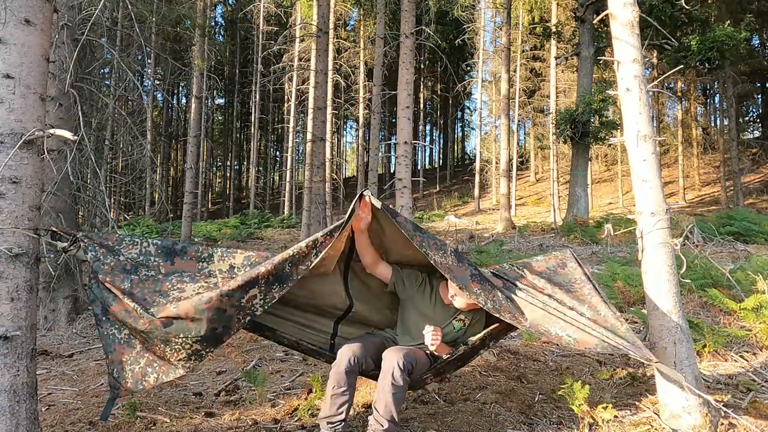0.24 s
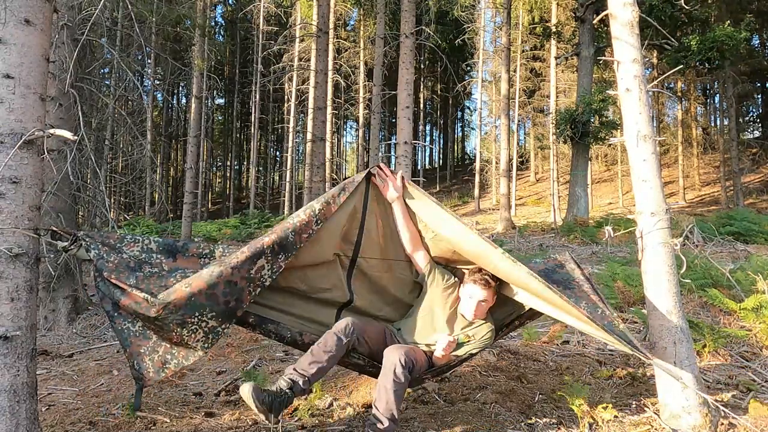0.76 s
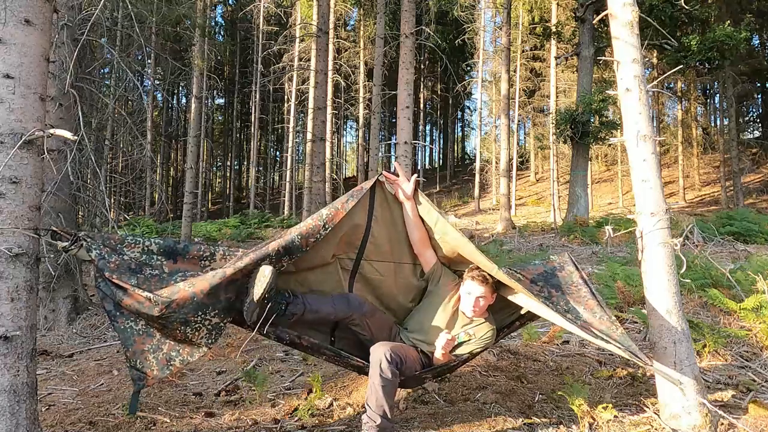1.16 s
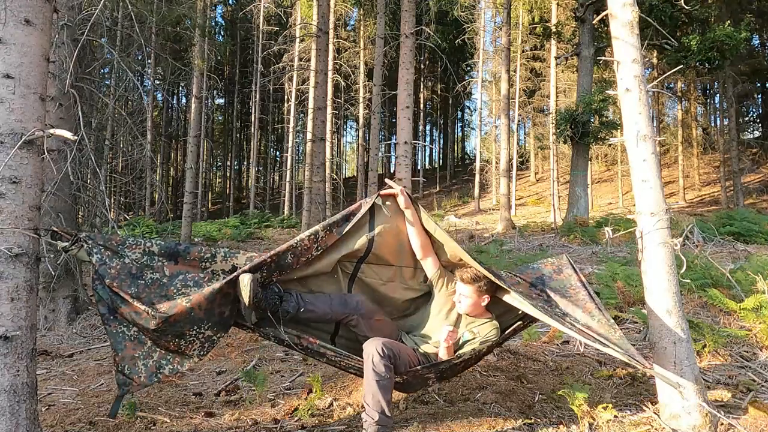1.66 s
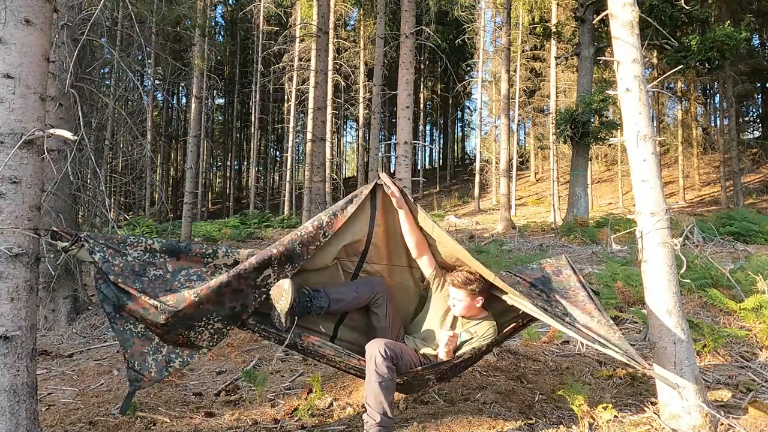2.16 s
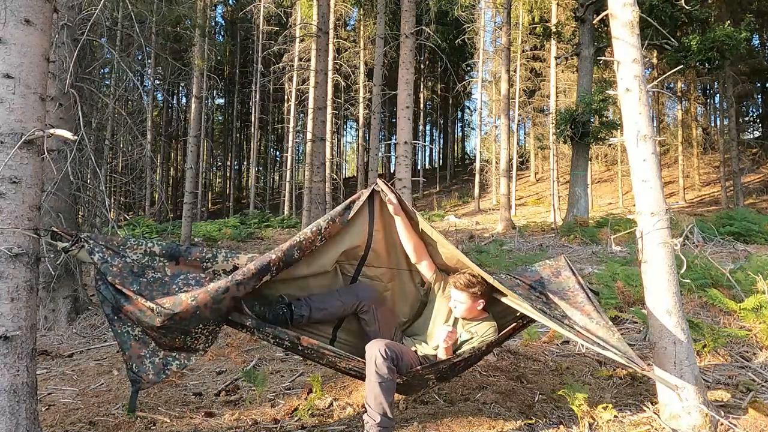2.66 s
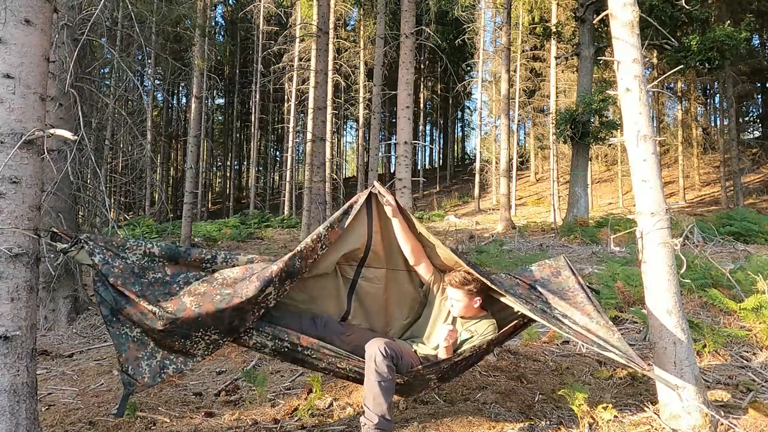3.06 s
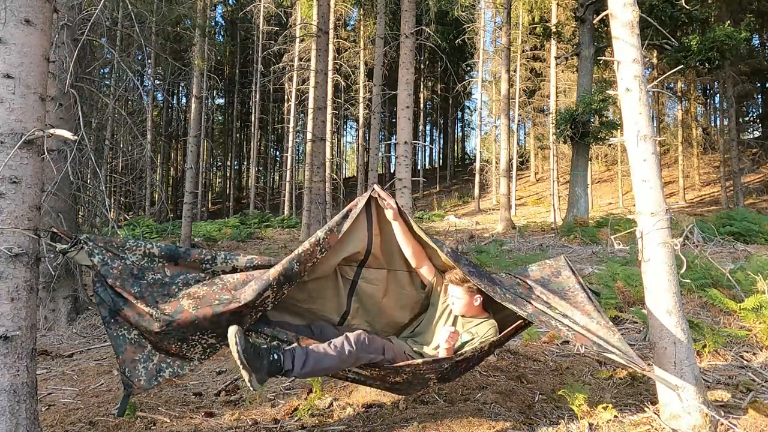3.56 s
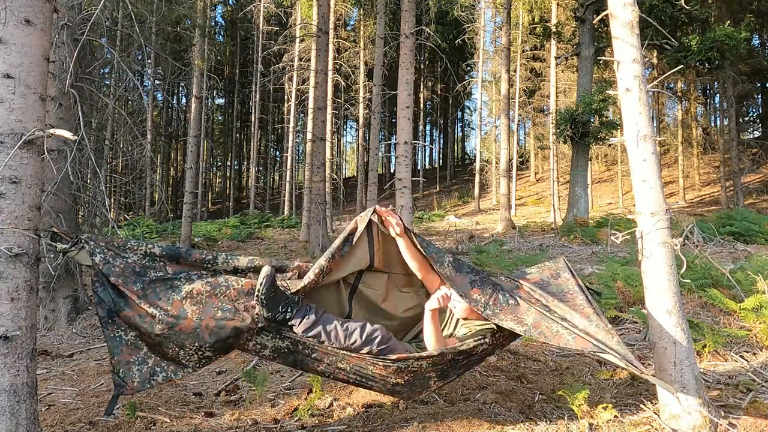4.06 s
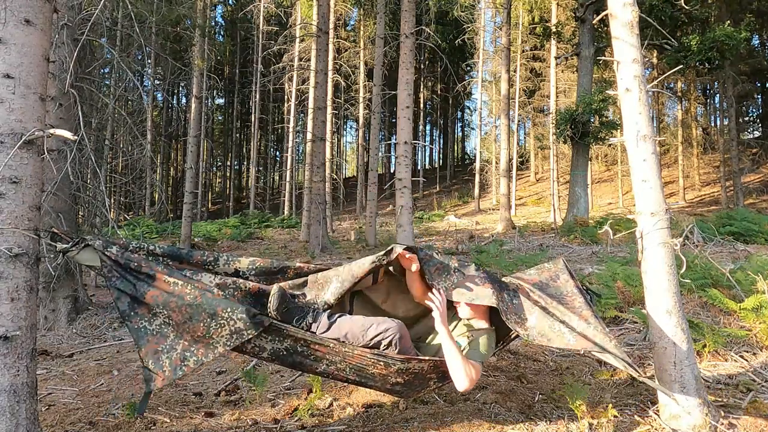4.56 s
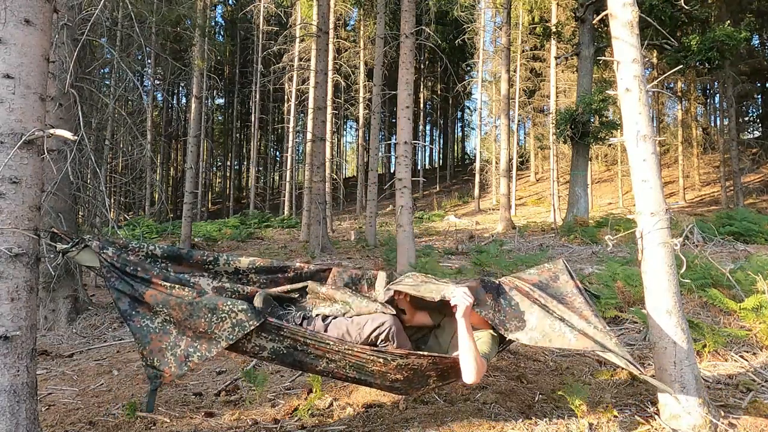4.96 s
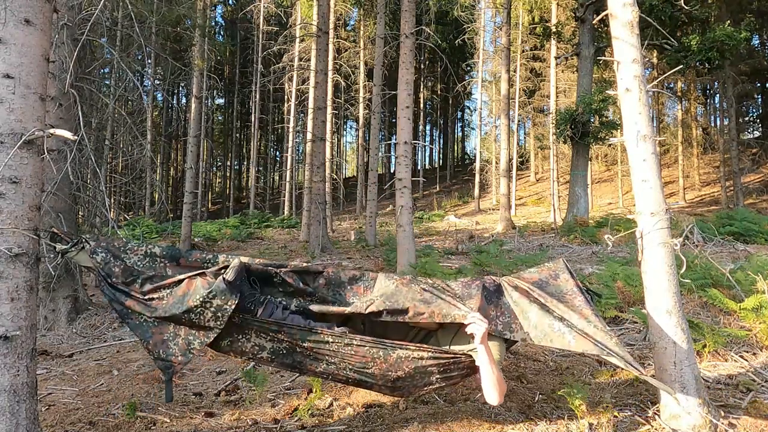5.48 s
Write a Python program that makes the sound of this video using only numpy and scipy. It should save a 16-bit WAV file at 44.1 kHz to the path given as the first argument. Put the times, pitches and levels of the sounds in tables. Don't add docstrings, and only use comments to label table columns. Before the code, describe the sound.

Close, nearly mono capture of a person getting into a coated-fabric hammock in a still conifer wood. Uneven rubbing strokes hiss and crinkle, creases snap, a quick zip-like squeak comes early on, longer whistling swipes follow, then the flap is pulled over with heavier rustling and a sharp pop. Slow low-frequency air puffs press on the microphone over a faint forest hush.

```python
import sys
import numpy as np
from scipy import signal
from scipy.fft import rfft, irfft
from scipy.io import wavfile

SR = 44100
rng = np.random.default_rng(int(sys.argv[2]) if len(sys.argv) > 2 else 0)


def bounce(signal):
    frames = np.transpose(np.atleast_2d(signal))
    limited = np.clip(frames, -1, 1)
    pcm = np.round(limited * 32767).astype(np.int16)
    wavfile.write(sys.argv[1], SR, pcm)


def volts_from_decibels(level):
    exponent = np.asarray(level, float) / 20
    return 10 ** exponent


N = 252252


def rms_one(x):
    return x / np.sqrt(np.mean(x ** 2) + 1e-20)


def in_time(rows):
    seconds, *columns = np.transpose(rows)
    return [np.interp(np.arange(N) / SR, seconds, column) for column in columns]


def coloured(x, points):
    hz = np.maximum(np.arange(N // 2 + 1) * SR / N, .1)
    at, db = np.transpose(points)
    return rfft(x) * volts_from_decibels(np.interp(np.log(hz), np.log(at), db))


def steady_noise(points):
    return rms_one(irfft(coloured(rng.standard_normal(N), points), N))


def drift(rate):
    r = np.exp(-80 * np.pi * rate / SR)
    noise = rng.standard_normal(N // 40 + 2002)
    slow = signal.lfilter([1], [1, -2 * r, r * r], noise)[2000:]
    return np.interp(np.arange(N) / 40, np.arange(len(slow)), rms_one(slow))


def ring(x, hz, t60):
    r, w = volts_from_decibels(-60 / (t60 * SR)), 2 * np.pi * hz / SR
    return signal.lfilter([0, np.sin(w)], [1, -2 * r * np.cos(w), r * r], x)


# frequency in Hz, level in dB per Hz.
FOREST_COLOUR = [(15, -2), (30, -5.5), (60, -9.5), (110, -6.5), (170, -11.5), (400, -16), (1000, -14.5),
                 (3000, -17), (6500, -21), (8250, -15), (10600, -27), (12800, -20.5), (15700, -29)]


def forest_air():
    return volts_from_decibels(-65) * steady_noise(FOREST_COLOUR)


# time in seconds, level in dB.
PUMP_LEVEL = [
    (0, -54),
    (.7, -49),
    (1.45, -47),
    (1.95, -58),
    (2.3, -52),
    (3.2, -56),
    (4.0, -43),
    (4.75, -48),
    (5.3, -43),
    (5.72, -52),
]
# frequency in Hz, level in dB per Hz.
PUMP_COLOUR = [(.5, -26), (1.5, -1), (3, 3), (6, -6.5), (11, -16), (18, -19.5), (30, -30), (60, -37.5),
               (150, -63.5)]


def sheet_pump():
    return volts_from_decibels(in_time(PUMP_LEVEL)[0]) * steady_noise(PUMP_COLOUR)


def snap(noise, hz, t60, crack_db):
    t = np.arange(len(noise)) / SR
    t60 = np.clip(t60, .003, .04)
    burst = volts_from_decibels(-22) * noise * volts_from_decibels(-60 * t / (1.7 * t60))
    burst[40] -= 1
    body = ring(burst, hz, t60)
    body -= volts_from_decibels(-3) * ring(burst, 1.7 * hz, .45 * t60)
    body -= volts_from_decibels(-11) * ring(burst, .62 * hz, t60)
    bright = signal.butter(1, [2200, 7500], "band", fs=SR, output="sos")
    crack = signal.sosfilt(bright, burst)
    return body / abs(body).max() + volts_from_decibels(crack_db) * crack / abs(crack).max()


def snaps(rows, crack_db):
    length = 4000
    out = np.zeros(N + length)
    for s, db, hz, t60 in rows:
        start = round(s * SR) - 40
        out[start:start + length] += volts_from_decibels(db) * snap(rng.standard_normal(length), hz, t60, crack_db)
    direct = out[:N]
    echo_s, echo_db = .0036, -10
    return direct + volts_from_decibels(echo_db) * np.roll(direct, round(echo_s * SR))


# start in seconds, peak in dB, ring in Hz, t60 in seconds.
CRACKS = [(.0321, -37.5, 2500, .005), (.0333, -35.5, 860, 0.0065), (.0332, -36, 2420, .007),
          (.0368, -43.5, 1390, 0.015), (.1192, -42.5, 950, 0.017), (1.4218, -38.5, 1200, 0.023),
          (2.07, -50, 890, .012), (2.247, -47, 700, 0.011), (2.277, -50, 2220, .008),
          (2.32, -39, 1510, 0.014), (2.338, -39, 2570, .01), (2.3425, -36, 3100, 0.0071),
          (4.502, -68, 1900, 0.0016), (4.785, -40.5, 1360, .015), (4.79, -40.5, 4270, 0.016),
          (4.871, -38, 1380, 0.0063), (5.009, -41.5, 845, .0073)]


def crease_cracks():
    return snaps(CRACKS, crack_db=-2.5)


# start in seconds, peak in dB, ring in Hz, t60 in seconds.
POPS = [(.375, -50.5, 640, 0.027), (1.271, -40, 1110, .011), (1.299, -40, 1560, 0.016),
        (1.519, -53, 480, 0.019), (1.61, -47, 980, 0.012), (1.791, -38.5, 2360, 0.0044),
        (2.005, -46, 630, 0.037), (2.447, -45.5, 1310, 0.0075), (2.67, -40, 1490, 0.013),
        (2.789, -46, 514, 0.01), (2.97, -37.5, 1534, 0.0065), (3.202, -55, 296.2, .025),
        (3.203, -49, 655, 0.018), (3.345, -64, 900, 0.011), (3.718, -42.5, 704, 0.019),
        (3.982, -44, 750, 0.0063), (4.012, -41, 2520, 0.012), (4.245, -36, 4500, .008),
        (4.76, -42, 3300, 0.021), (4.826, -43, 496, 0.0092), (4.838, -46, 650, 0.011),
        (4.848, -42, 610, 0.011), (5.012, -43, 1470, 0.017), (5.025, -46, 3280, 0.022),
        (5.037, -46, 600, 0.01), (5.21, -45, 1520, 0.01), (5.327, -29.5, 1950, 0.0028),
        (5.53, -38, 1450, .012), (5.699, -41, 1010, 0.025)]


def fold_pops():
    return snaps(POPS, crack_db=-3)


def whistle(rows, blur, steady):
    hz, *levels = in_time(rows)
    t = np.arange(N) / SR
    phase = 2 * np.pi * np.cumsum(hz * (1 + 0.01215 * drift(39.9))) / SR
    out = 0
    for k, db in enumerate(levels, 1):
        r = np.exp(-2 * np.pi * blur * k / SR)
        wobble = rms_one(signal.lfilter([1], [1, -2 * r, r ** 2], rng.standard_normal((2, N))))
        tone = (steady + wobble[0]) * np.cos(k * phase) + wobble[1] * np.sin(k * phase)
        flutter_db = 1.0 * drift(39)
        out = out + volts_from_decibels(db + flutter_db) * rms_one(tone)
    return out * (t > rows[0][0]) * (t < rows[-1][0])


# time in seconds, thread rate in Hz, fundamental in dB, octave in dB.
SAG = [
    (.78, 326, -73, -86),
    (.83, 362.6, -66, -101),
    (.93, 398, -68.5, -84),
    (1.02, 377, -64.5, -85),
    (1.08, 355, -86, -85),
]
TUG = [
    (2.23, 910, -77, -82),
    (2.245, 959, -67, -57),
    (2.265, 1044, -58, -52),
    (2.28, 1160, -63, -62),
    (2.29, 1200, -85, -80),
]
ZIP = [
    (2.295, 950, -78.5, -85),
    (2.31, 1031, -52, -70),
    (2.319, 1090, -48, -66),
    (2.322, 1454, -54, -57),
    (2.335, 1505, -43, -55),
    (2.339, 1310, -46, -47),
    (2.343, 1620, -54, -37.5),
    (2.349, 1590, -68, -64),
    (2.36, 1600, -90, -90),
]
LEAD_IN = [
    (2.5, 420, -90, -84),
    (2.54, 530, -80, -64),
    (2.57, 720, -82, -70),
    (2.605, 1010, -82, -66),
    (2.63, 1100, -90, -88),
]
SWIPE = [
    (2.68, 480, -88, -72),
    (2.70, 530, -80, -60),
    (2.76, 970, -68, -58),
    (2.82, 925, -64, -54),
    (2.865, 865, -66, -54.5),
    (2.945, 885, -68, -54.5),
    (3.02, 740, -68, -56),
    (3.06, 520, -68, -54),
    (3.11, 290, -78, -68),
]
SLACK = [
    (2.74, 943, -72, -90),
    (2.775, 1080, -55, -83),
    (2.82, 930, -65, -80),
    (2.9, 980, -58, -82),
    (2.97, 720, -60, -80),
    (3.03, 670, -57, -75),
    (3.1, 418, -65, -80),
    (3.14, 377, -77, -92),
]
SLIDE = [
    (3.96, 895, -71, -88),
    (4.04, 942, -55, -76),
    (4.11, 900, -70, -78),
    (4.185, 830, -58, -61),
    (4.3, 724, -64, -76),
    (4.4, 670, -88, -74),
]
FLAP = [
    (5.11, 1150, -78, -90),
    (5.14, 1076, -58, -80),
    (5.2, 1004, -63, -80),
    (5.25, 998, -59, -80),
    (5.3, 1160, -75, -90),
]


def weave_whistles():
    swipes = whistle(SWIPE, blur=30, steady=1.7) + whistle(LEAD_IN, blur=45, steady=.9)
    swipes += whistle(SLACK, blur=70, steady=.2)
    tugs = whistle(ZIP, blur=120, steady=.8) + whistle(TUG, blur=250, steady=.1)
    slow = whistle(SAG, blur=30, steady=.4) + whistle(SLIDE, blur=110, steady=.1)
    return swipes + tugs + slow + whistle(FLAP, blur=60, steady=.3)


def slips(per_s, spread_db, clump_db):
    sizes = volts_from_decibels(spread_db * np.minimum(rng.exponential(1, N), 3)) * rng.choice([-1, 1], N)
    born = rng.random(N) < per_s * volts_from_decibels(clump_db * drift(25)) / SR
    return rms_one(sizes * born)


def crinkles(body_db):
    pops = slips(per_s=160, spread_db=5.0, clump_db=3.5)
    pitches, dealt = np.geomspace(260, 4600, 14), rng.integers(0, 14, N)
    rings = 0
    for k, hz in enumerate(pitches):
        rings = rings + ring(pops * (dealt == k), hz, 5.9 / hz ** 0.92) * hz ** 0.57
    return volts_from_decibels(body_db - 11.5) * rms_one(rings)


# middle in seconds, half length in seconds, sheen in dB,
# heaviness in dB (how much more the low body sounds).
STROKES = [(0.112, 0.12, -77, 11), (0.415, 0.12, -57, -3), (0.715, 0.14, -61.5, 2),
           (0.973, 0.11, -56.5, -.5), (1.215, 0.061, -63, 3), (1.353, 0.056, -52.5, -2),
           (1.503, 0.059, -64, 1), (1.647, .05, -68, 4.5), (1.757, 0.051, -59.5, -1),
           (1.86, 0.032, -60, -0.5), (1.992, 0.068, -59.5, -2), (2.149, 0.08, -59.5, -3),
           (2.267, 0.024, -52.5, -3.5), (2.33, 0.019, -53.5, 4.5), (2.42, 0.056, -63, -4),
           (2.596, 0.03, -62.5, -21), (2.775, 0.066, -55.5, 3), (2.907, 0.093, -54, 2.5),
           (3.035, 0.035, -64, 12.5), (3.254, 0.073, -69, -7), (3.551, 0.075, -52, -4),
           (3.673, 0.12, -52, -3), (4.078, 0.1, -56, -2.6), (4.374, 0.19, -52.5, -1), (4.637, 0.11, -64, 6),
           (4.777, 0.034, -56.5, 2.5), (5.018, 0.065, -58, 1.5), (5.122, 0.045, -59, 1.5),
           (5.255, 0.1, -52, 2), (5.51, 0.14, -51.5, 0.4)]
# time in seconds, level in dB.
WEIGHT = [(0.0, -76.5), (1.24, -61), (1.91, -72), (2.02, -67), (2.1, -71.5), (2.28, -60), (2.9, -78),
          (3.09, -60.5), (3.39, -76.5), (3.78, -62.5), (3.9, -66.5), (4.01, -64), (4.72, -64),
          (4.86, -57.5), (4.92, -69.5), (5.51, -55), (5.58, -61), (5.72, -61)]
STROKE_DB = [-20.5, 0, -1.4, -1]
HEAVY_SHARE = [0.15, 1.03, 0.62, 0]
WEIGHT_DB = [7, 4.5, -6.5, -9.5]


def effort():
    t = np.arange(0, N + 64, 64) / SR
    s, half, db, heavy = np.transpose(STROKES)[:, :, None]
    rise_share, fall_share = 0.87, 0.92
    away = np.abs(t - s) / (np.maximum(half, .01) * np.where(t < s, rise_share, fall_share))
    stroke_db = db - 3.5 * np.minimum(away, 8) ** 2.46
    weight_db = np.interp(t, *np.transpose(WEIGHT))
    layers = []
    for layer_db, share, creep_db in zip(STROKE_DB, HEAVY_SHARE, WEIGHT_DB):
        strokes = np.sum(volts_from_decibels(stroke_db + layer_db + share * heavy) ** 2, axis=0)
        power = strokes + volts_from_decibels(weight_db + creep_db) ** 2
        layers.append(np.interp(np.arange(N) / SR, t, 10 * np.log10(power)))
    return np.array(layers)


# frequency in Hz, level in dB per Hz.
CLOTH_COLOUR = [(70, -20), (150, -13.5), (260, -6), (500, -2), (950, -1), (1750, -1.5), (4260, -3.5),
                (6500, -8.5), (8250, -3), (9400, -8.5), (10600, -16.5), (12800, -9), (14600, -16.5),
                (15700, -16)]


def cloth_drag():
    layers = effort()
    mean_db = 10 * np.log10(np.mean(volts_from_decibels(layers) ** 2, axis=1, keepdims=True))
    swing = layers - mean_db
    rub = rng.standard_normal(N) + volts_from_decibels(-7.5) * slips(per_s=1500, spread_db=3.0, clump_db=1.5)
    spectrum = coloured(rub, CLOTH_COLOUR)
    hz = np.maximum(np.arange(N // 2 + 1) * SR / N, .1)
    together, out = drift(44), 0
    for centre in 100 * 2 ** np.arange(0, 8, .5):
        window = np.cos(np.pi / 2 * np.clip(np.log2(hz / centre) * 2, -1, 1)) ** 2
        place = np.interp(np.log(centre), np.log([330, 1300, 4100, 9500]), np.arange(4))
        low = min(int(place), 2)
        level_db = swing[low] + (place - low) * (swing[low + 1] - swing[low])
        flicker_db = .6 * together + .9 * drift(22)
        out = out + irfft(spectrum * window, N) * volts_from_decibels(level_db + flicker_db)
    return volts_from_decibels(-51.58) * rms_one(out) + crinkles(layers[1])


# frequency in Hz, level in dB re centre.
SIDE_SHARE = [(20, -42), (120, -28.5), (400, -26), (1500, -34), (6000, -26), (15000, -18)]
# middle in seconds, length in seconds,
# gain in dB.
WIDE = [(0.037, 0.022, 1), (0.413, 0.042, 10.5), (1.183, .06, 8.5), (1.47, 0.094, 7.5), (2.505, 0.052, 6),
        (2.873, 0.059, 8), (3.15, 0.041, 5), (3.34, 0.12, 5), (3.81, 0.02, 10), (3.9, 0.017, 9),
        (4.696, 0.021, 9), (4.904, 0.049, 6), (5.703, 0.031, 3)]


def side_spread(centre):
    t = np.arange(N) / SR
    wide_db = sum(db * np.exp(-((t - s) / length) ** 4) for s, length, db in WIDE)
    return volts_from_decibels(wide_db) * np.roll(irfft(coloured(centre, SIDE_SHARE), N), 211)


def scene():
    centre = forest_air() + crease_cracks() + fold_pops() + weave_whistles() + cloth_drag()
    side = side_spread(centre)
    centre = centre + sheet_pump()
    return np.array([centre + side, centre - side])


def band_limit(x):
    return signal.sosfilt(signal.butter(12, 16620, fs=SR, output="sos"), x)


def record(dry):
    top_cut = signal.ellip(14, .3, 70, 15720, fs=SR, output="sos")
    mix = signal.sosfilt(top_cut, dry)
    return band_limit(mix)


dry = scene()
out = record(dry)
bounce(out)
```